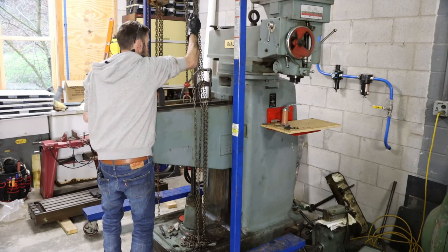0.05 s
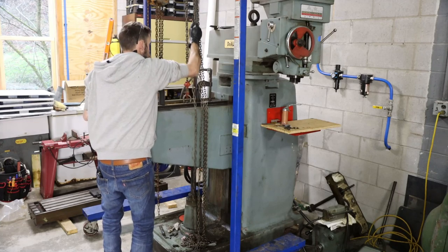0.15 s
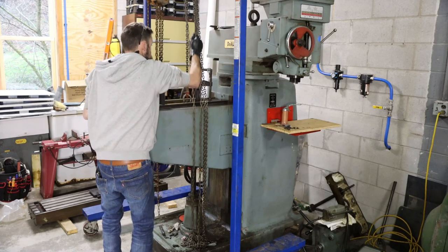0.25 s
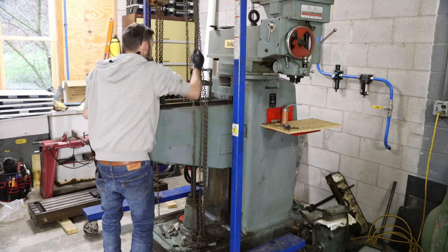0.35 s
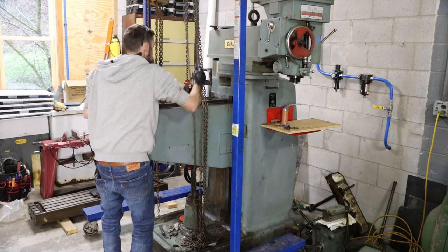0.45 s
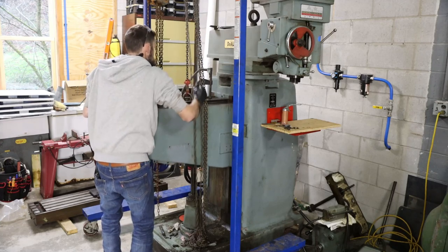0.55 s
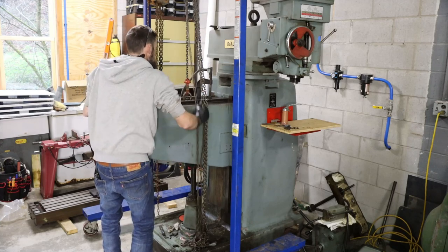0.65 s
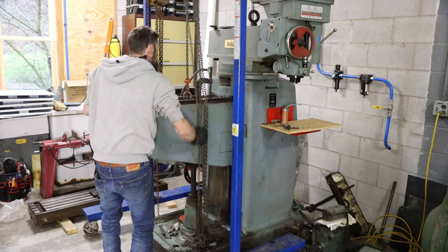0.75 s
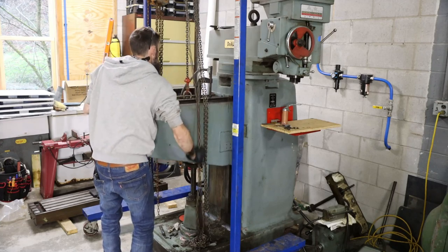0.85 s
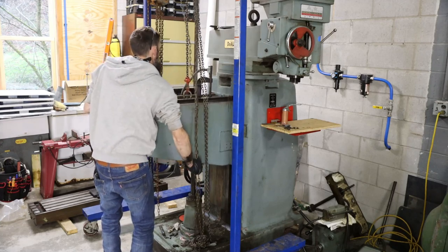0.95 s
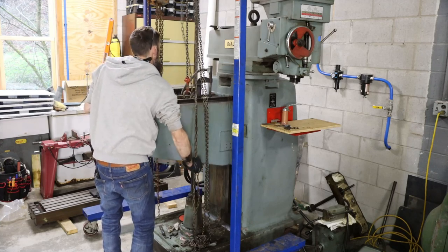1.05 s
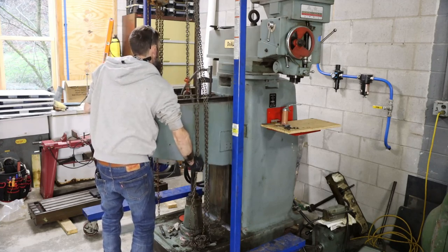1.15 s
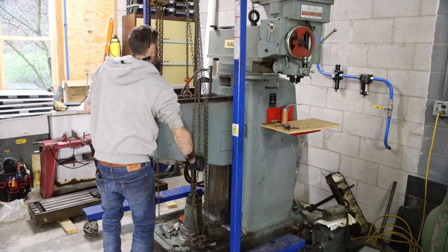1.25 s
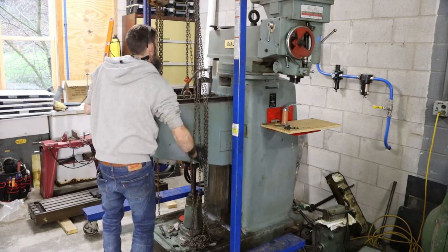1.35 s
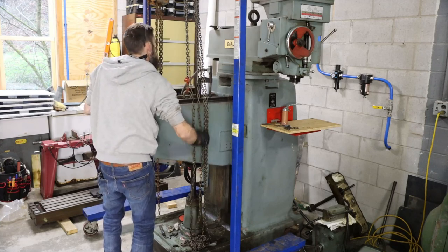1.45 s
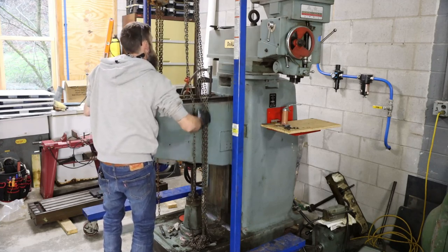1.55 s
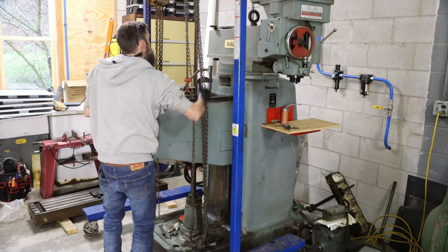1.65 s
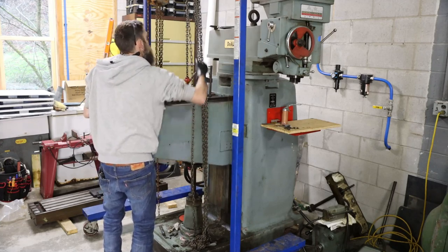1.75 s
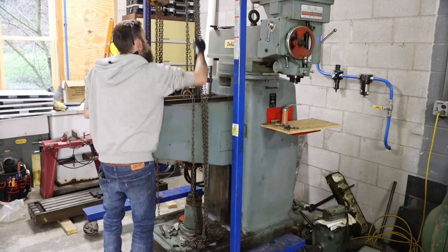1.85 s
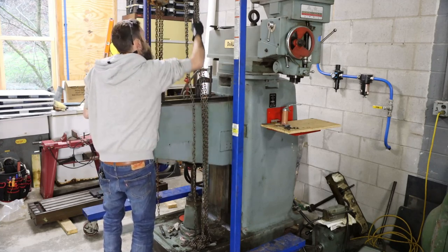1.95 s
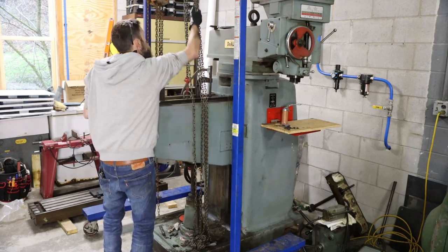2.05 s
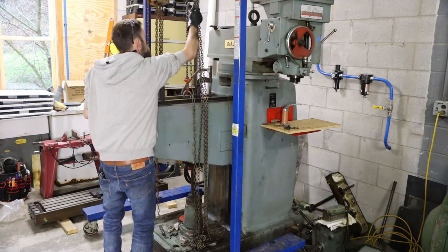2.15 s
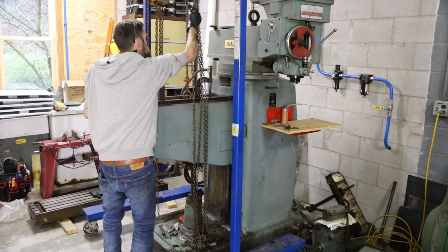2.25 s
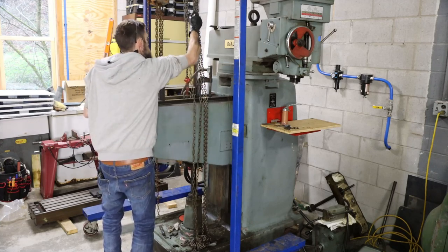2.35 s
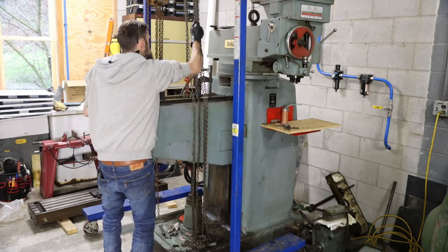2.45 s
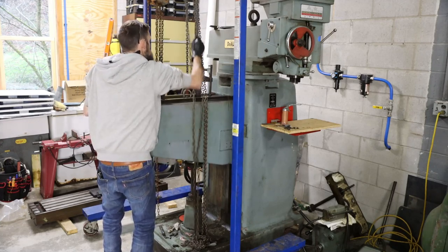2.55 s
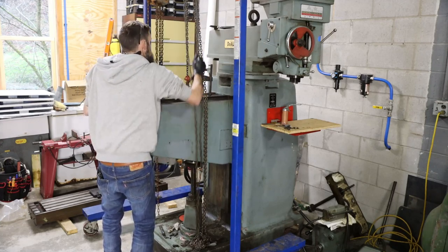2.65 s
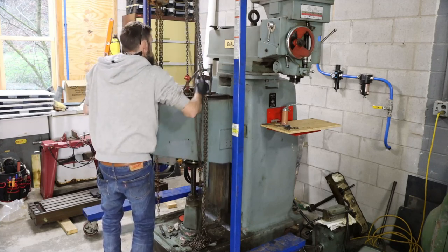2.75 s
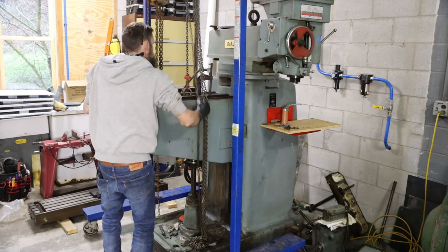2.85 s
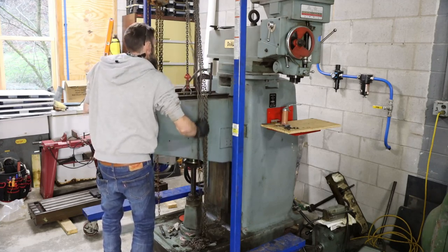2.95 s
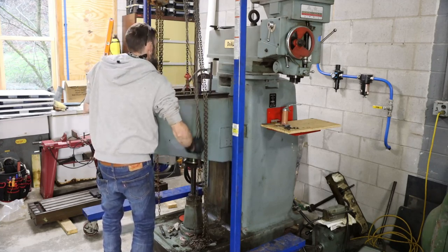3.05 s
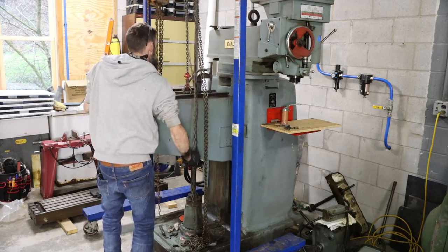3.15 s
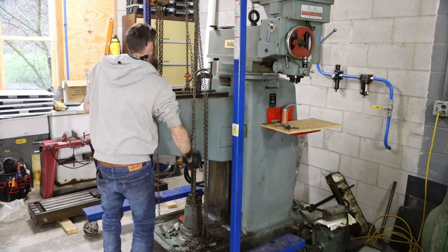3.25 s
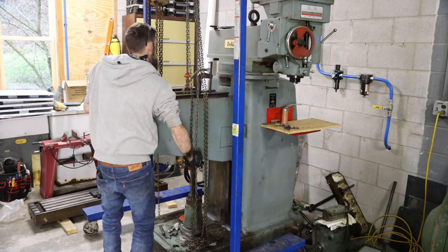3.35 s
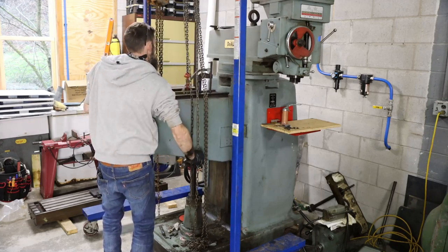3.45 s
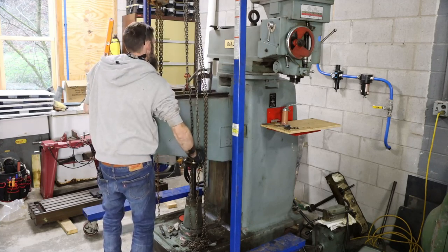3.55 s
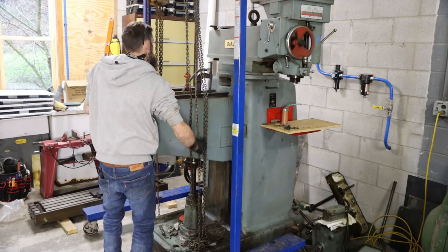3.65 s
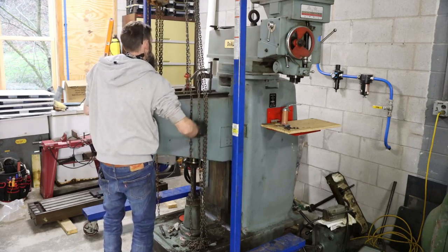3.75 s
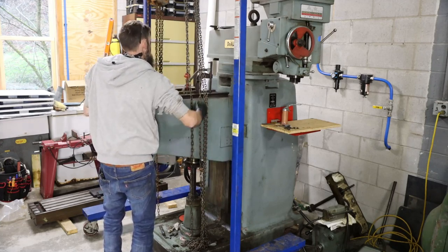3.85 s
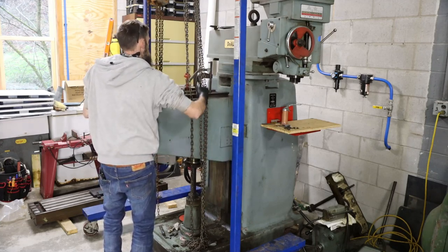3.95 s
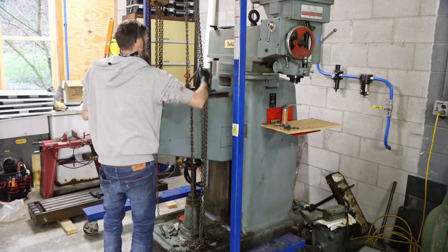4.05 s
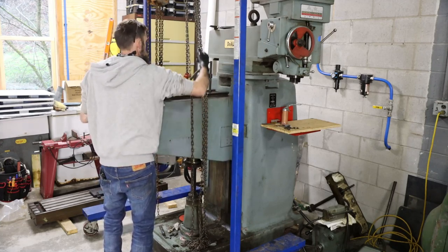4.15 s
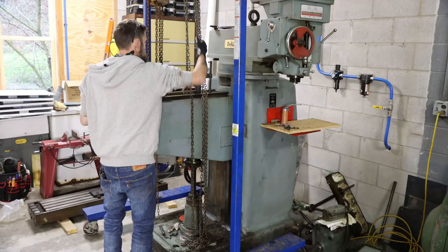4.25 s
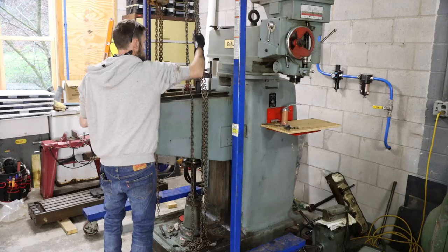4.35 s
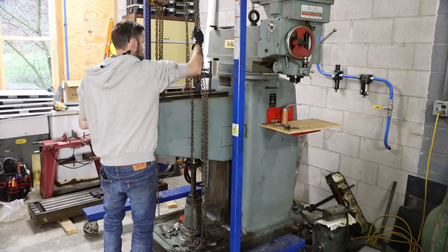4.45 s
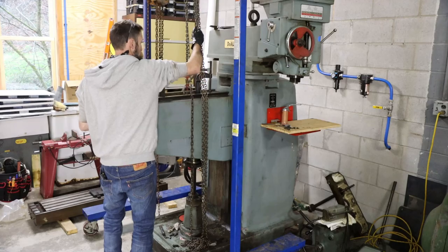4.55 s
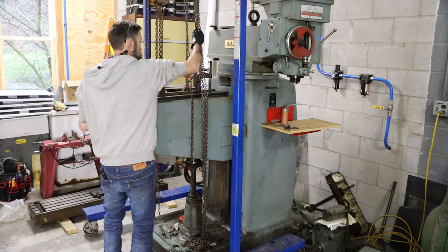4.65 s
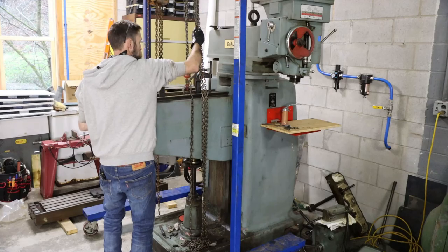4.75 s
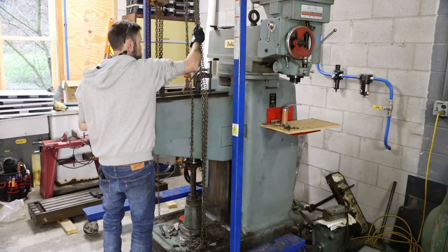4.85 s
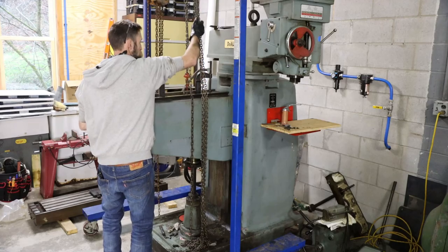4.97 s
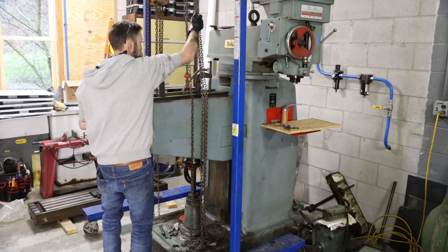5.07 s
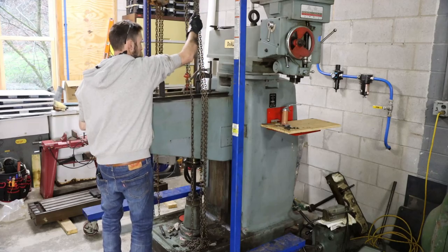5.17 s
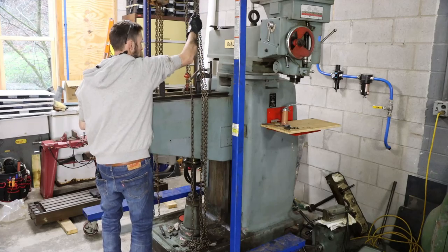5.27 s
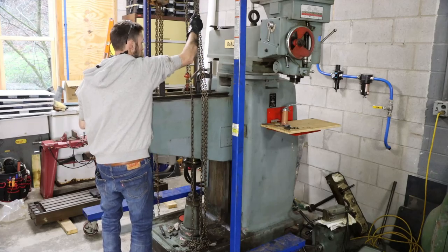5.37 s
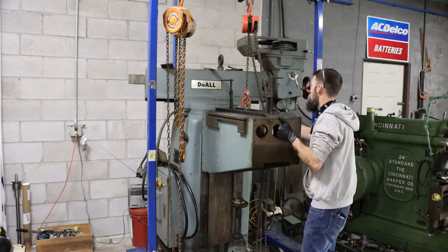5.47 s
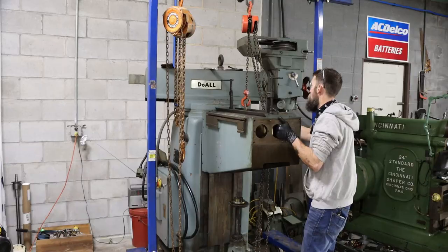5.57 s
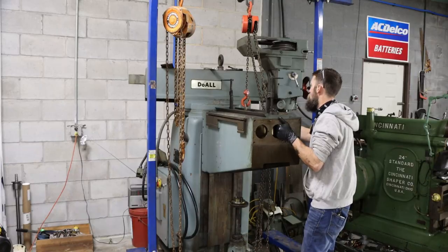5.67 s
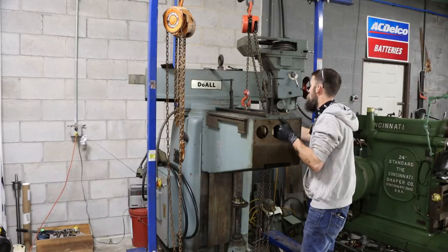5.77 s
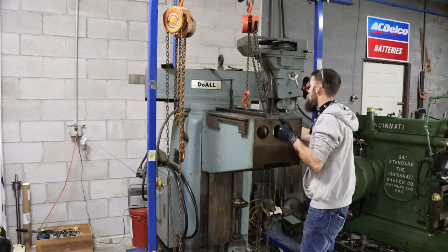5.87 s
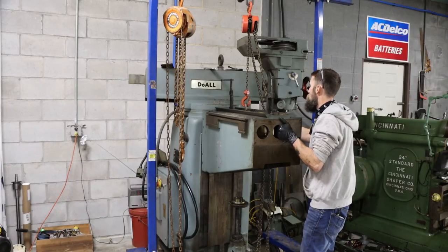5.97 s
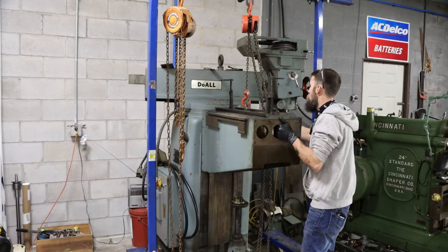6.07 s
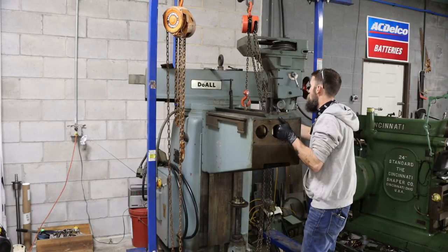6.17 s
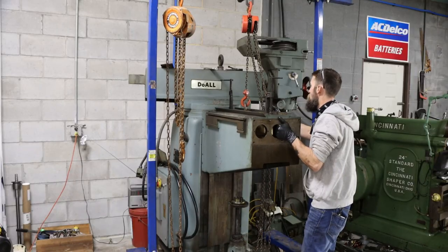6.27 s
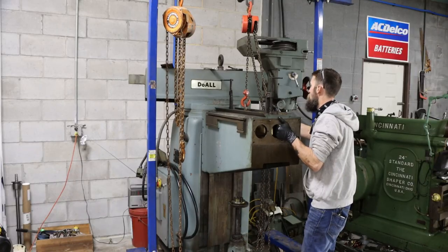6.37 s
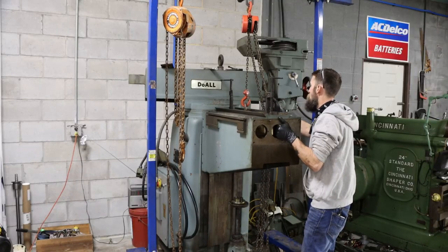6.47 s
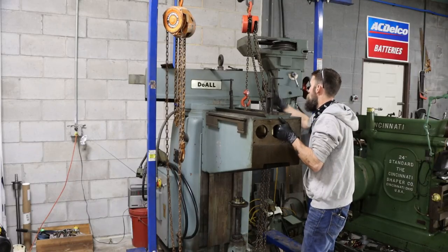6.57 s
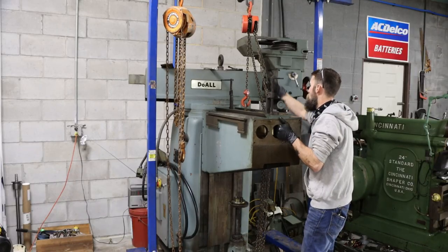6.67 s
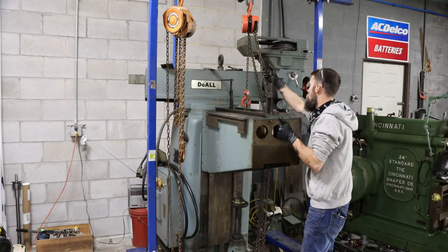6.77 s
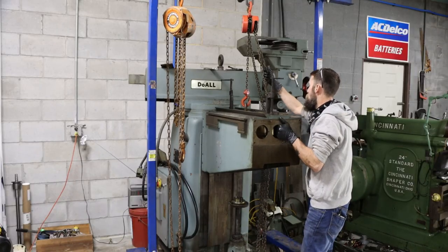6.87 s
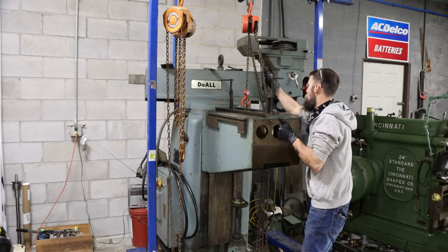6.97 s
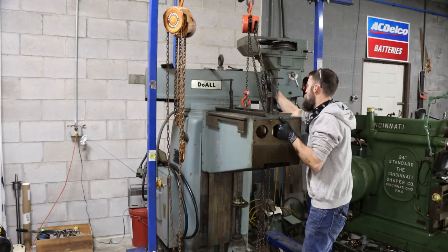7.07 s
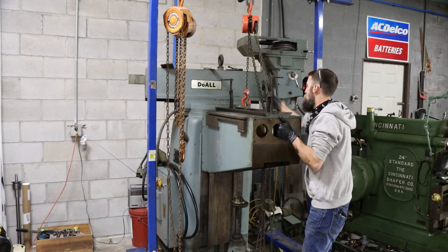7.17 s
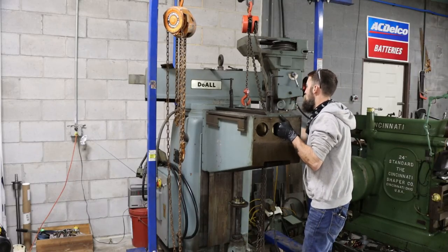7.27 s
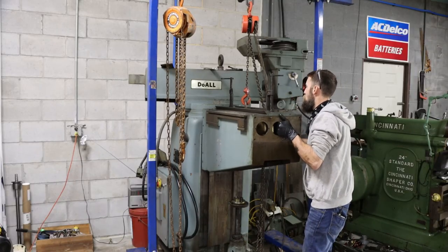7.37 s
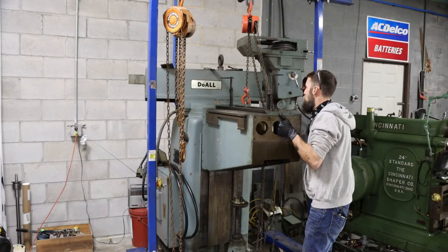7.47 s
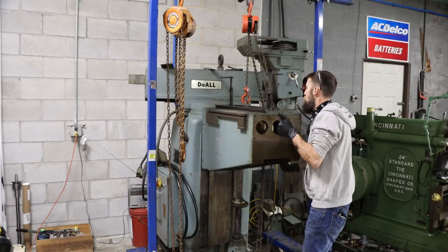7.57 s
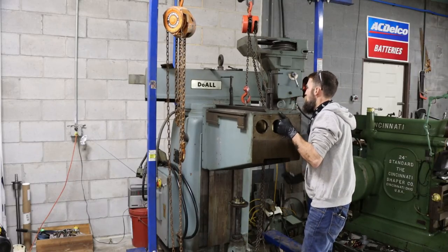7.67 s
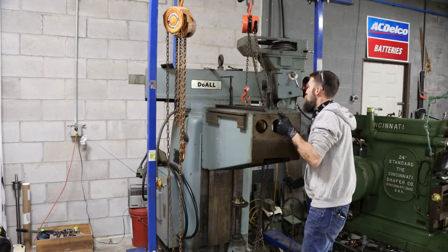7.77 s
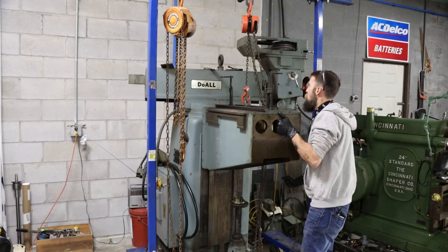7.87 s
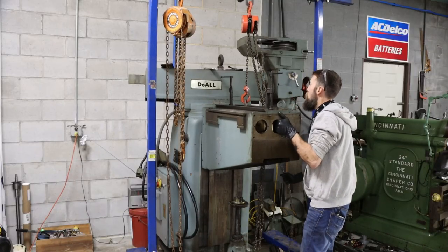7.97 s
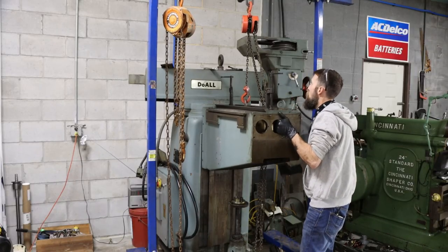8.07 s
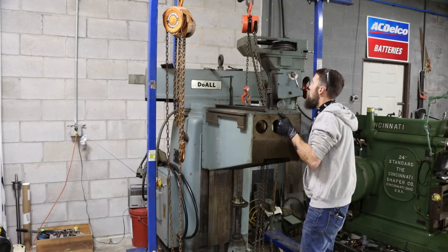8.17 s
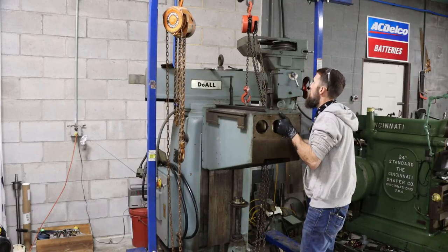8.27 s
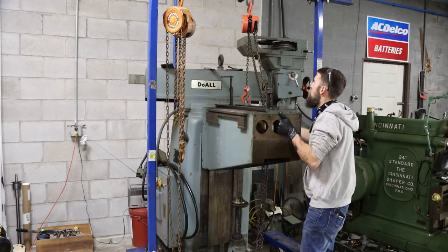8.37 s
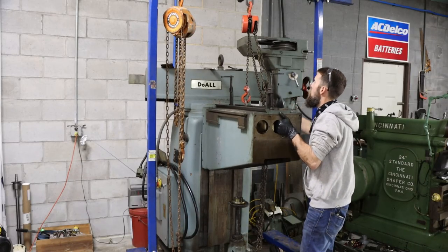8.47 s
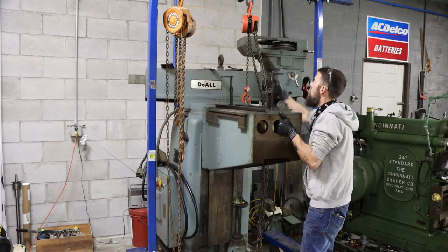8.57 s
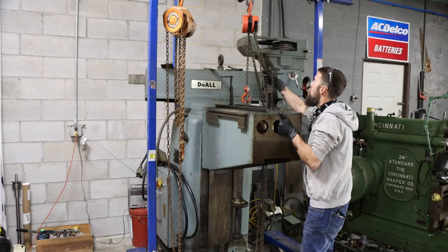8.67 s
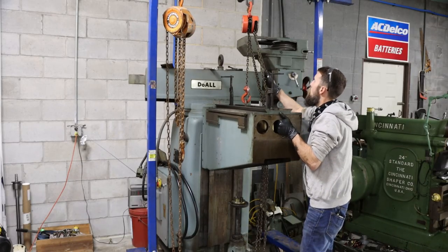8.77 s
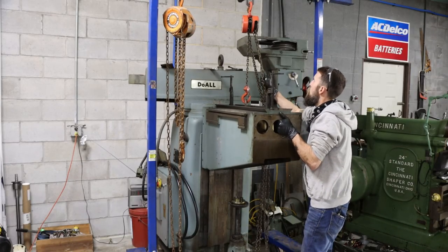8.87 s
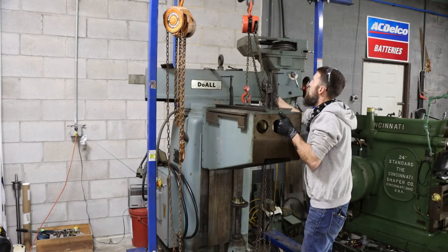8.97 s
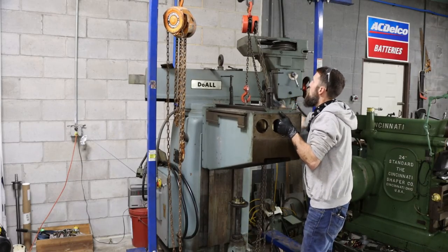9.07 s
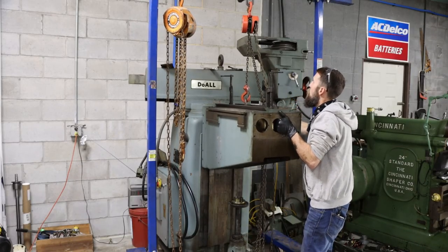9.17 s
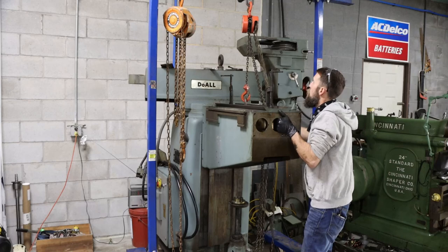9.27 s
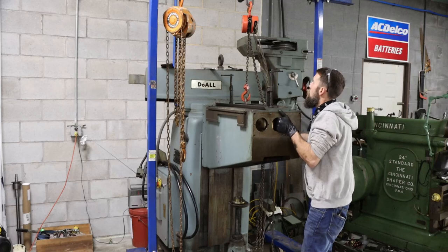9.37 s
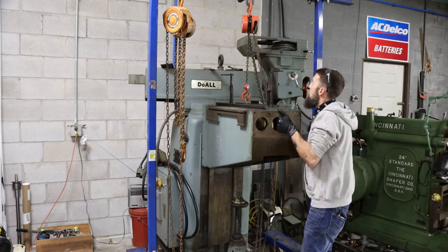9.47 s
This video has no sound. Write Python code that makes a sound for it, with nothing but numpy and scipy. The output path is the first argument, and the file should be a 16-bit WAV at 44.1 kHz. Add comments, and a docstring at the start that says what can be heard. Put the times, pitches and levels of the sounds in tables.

```python
"""Two hand chain hoists lift a heavy iron casting in a block-walled machine shop.
First one hoist is pulled twice: the brake pawl clicks over its ratchet, links clink on the hand wheel
and the gear housing clatters. Between pulls the slack chain swings and knocks, and a sleeve rustles.
Near 4 s and 6 s the hanging load shifts, and the blow sets the frame booming in its normal modes.
From 7 s the second hoist is pulled twice, at a slower tooth rate."""
import sys
import numpy as np
from scipy import signal
from scipy.fft import rfft, irfft
from scipy.io import wavfile
from scipy.ndimage import uniform_filter1d, map_coordinates

SR = 44100
rng = np.random.default_rng(int(sys.argv[2]) if len(sys.argv) > 2 else 0)


def write(x):
    x = np.atleast_2d(x).T
    wavfile.write(sys.argv[1], SR, np.round(np.clip(x, -1, 1) * 32767).astype(np.int16))


N = 419832
TIME = np.arange(N) / SR
AT_FIRST_HOIST = TIME < 5.45


def amp(db):
    """Level is logarithmic: 20 dB is a factor of ten in amplitude."""
    return 10 ** (np.asarray(db) / 20)


def noise():
    """White noise: independent samples give a flat spectrum of unit power."""
    return rng.standard_normal(N)


def wander(per_s):
    """Random modulation: straight lines join per_s Gaussian values a second."""
    return np.interp(TIME * per_s, np.arange(N), noise())


def convolve(x, response):
    """Convolution with an impulse response scaled to unit energy."""
    return signal.fftconvolve(x, response / np.sqrt(np.sum(response ** 2)))[:N]


def colour(x, points, size=2048):
    """Minimum-phase filtering through points of (frequency [Hz], relative level [dB])."""
    hz, db = np.transpose(points)
    grid = np.maximum(np.arange(size // 2 + 1) * SR / size, 1)
    gain = amp(np.interp(np.log(grid), np.log(hz), db))
    cepstrum = irfft(np.log(gain))
    cepstrum[1:size // 2] *= 2
    cepstrum[size // 2 + 1:] = 0
    return convolve(x, irfft(np.exp(rfft(cepstrum))))


def resonate(x, modes):
    """Modal superposition: each mode is a damped sine, and a wider band decays sooner."""
    t = TIME[:SR // 2]
    rings = [(-1) ** k * amp(db) * np.sqrt(width)
             * np.exp(-np.pi * width * t) * np.sin(2 * np.pi * hz * t)
             for k, (hz, width, db) in enumerate(modes)]
    return convolve(x, sum(rings))


def envelope(times, db, fade_s, rise_s):
    """Incoherent addition: contacts swell and die away, and their powers sum."""
    hits = np.zeros(N)
    np.add.at(hits, np.clip(np.asarray(times) * SR, 0, N - 1).astype(int), amp(db) ** 2)
    t = TIME[:SR]
    shape = (1 - np.exp(-t / rise_s)) * np.exp(-t / fade_s)
    power = signal.fftconvolve(hits, (shape / shape.max()) ** 2)[:N]
    return np.sqrt(np.maximum(power, 0))


def shop_air():
    """Stationary noise: the quiet air of the shop, strongest at low frequencies."""
    # (frequency [Hz], level [dB])
    spectrum = [(15, -53), (25, -8), (333, -2.5), (382, 2), (500, -5.5), (749, -3.5), (1180, -12),
                (1280, -13.5), (2390, -18), (6140, -25), (13400, -31), (15800, -35.5)]
    return amp(-56) * colour(noise(), spectrum)


def room(x, low_t60, high_t60, low_db, high_db):
    """Reverberation: the block walls return a diffuse field whose treble decays sooner."""
    t = TIME[:SR]
    low_band = signal.butter(2, 2500, fs=SR, output="sos")
    high_band = signal.butter(1, [2500, 9000], "bandpass", fs=SR, output="sos")
    tail = sum(signal.sosfilt(band, rng.standard_normal(SR)) * amp(db - 60 * t / t60) / np.sqrt(t60)
               for band, db, t60 in ((low_band, low_db, low_t60), (high_band, high_db, high_t60)))
    tail *= (1 - np.exp(-t / 0.0009)) * np.sqrt(2 * np.log(1000) / SR)
    return x + signal.fftconvolve(x, tail)[:N]


# The body leans into the chain: (time [s], level [dB])
HEAVES = [(.25, -39.5), (1.822, -59), (2.58, -46)]
def heaves():
    """Soft impact: the moving body makes muffled bumps with little but bass."""
    bumps = noise() * envelope(*np.transpose(HEAVES), fade_s=0.1, rise_s=0.045)
    return colour(bumps, [(25, -15.5), (90, 2.0), (170, 2.0), (280, -15.5), (2000, -60)])


# Spectrum of rubbing cloth: (frequency [Hz], level [dB])
CLOTH = [(60, -52), (300, -15.5), (1000, -9.5), (2500, -7.5), (4500, -0.5), (6500, -3.5), (9000, -4),
         (12000, -7.5), (15800, -15)]
# The arm reaches up: (centre time [s], half length [s], level [dB])
REACHES = [(1.85, 0.26, -48), (4.13, 0.34, -50), (5.06, 0.12, -56.5), (6.21, 0.086, -63.5),
           (6.658, 0.17, -52.5), (8.34, 0.014, -48), (8.51, 0.23, -47.5)]
# Small dry ticks: (time [s], level [dB])
TICKS = [(1.336, -40), (5.976, -40.5), (5.999, -43), (6.015, -41), (6.149, -42), (6.194, -34), (7.032, -36),
         (8.089, -27), (8.201, -26)]
def sleeve():
    """Stick-slip friction: cloth catches unevenly, and a drifting comb filter colours it as it folds."""
    slide = sum(amp(db) * np.exp(-((TIME - middle) / half) ** 2) for middle, half, db in REACHES)
    rub = noise() * slide * amp(7.6 + 2.6 * wander(220) + 0.43 * wander(6))
    fold_lag = .0002 * np.exp(0.33 * wander(16))
    rub += 0.22 * map_coordinates(rub, [(TIME - fold_lag) * SR], order=3)
    ticks = noise() * envelope(*np.transpose(TICKS), fade_s=0.00091, rise_s=.0001)
    low_cut = signal.butter(2, 500, "highpass", fs=SR, output="sos")
    return signal.sosfilt(low_cut, colour(rub + ticks, CLOTH))


# The load shifts: (time [s], thud level [dB], ring level [dB])
BOOMS = [(4.215, -6.5, -19.5), (6.261, -18, -20)]
# Spectrum of the rumble: (frequency [Hz], level [dB])
RUMBLE = [(25, -34.5), (60, -6.5), (110, -10), (175, 1), (280, -2), (420, -11.5), (600, -11), (900, -17.5),
          (1600, -29), (3000, -45), (15000, -65)]
# Low modes driven by the blow: (frequency [Hz], level [dB], decay time [s])
BLOW_MODES = [(193.5, -4.5, 0.021), (168, -10, 0.09), (278, -5.5, 0.01), (280, -20, 0.14)]
# Modes of the loaded frame: (frequency [Hz], level [dB], time to fall 60 dB [s])
FRAME_MODES = [(116, -8.5, 0.9), (233, -22.5, 2.4), (374, -14.5, 0.86), (565, -16, 1.0), (870, -21.5, 0.37),
               (1010, -28.5, 1.5), (1120, -32, 0.65), (1385, -24, 0.94), (1745, -36, 0.35)]
TWIN_HZ = (674.5, 681.7)
def load_booms():
    """Free vibration: after a dull blow the frame rumbles and rings, and two close modes beat."""
    times, thud_db, _ = np.transpose(BOOMS)
    out = colour(noise() * envelope(times, thud_db - 12, fade_s=0.13, rise_s=0.002), RUMBLE)
    low_cut = signal.butter(2, 120, "highpass", fs=SR, output="sos")
    for start, blow_db, ring_db in BOOMS:
        i = int(start * SR)
        t = TIME[:min(2 * SR, N - i)]
        blow = sum(amp(blow_db + db) * np.exp(-t / fade) * np.sin(2 * np.pi * hz * t)
                   for hz, db, fade in BLOW_MODES)
        blow = signal.sosfilt(low_cut, blow)  # a slim frame radiates little deep bass
        ring = sum(amp(ring_db + db - 60 * t / t60) * np.sin(2 * np.pi * hz * t)
                   for hz, db, t60 in FRAME_MODES)
        lower, upper = (np.sin(2 * np.pi * hz * t) for hz in TWIN_HZ)
        beating = amp(ring_db - 6.5 - 60 * t / 0.78) * (lower - 1.27 * upper)  # starts in antiphase
        out[i:i + len(t)] += blow + beating + ring * (1 - np.exp(-t / .015))
    return out


def loose_touches(drag_db=-29, drag_rise_s=0.038, drag_fade_s=0.11,
                  swing_db=-34, swing_fade_s=0.52, touches_per_s=13):
    """Damped swinging: the envelope of a chain that drags taut, then, let go, touches ever more softly."""
    starts, ends = np.transpose(PULLS_A + PULLS_B)[:2]
    drag = sum(np.exp(-np.maximum((s - TIME) / drag_rise_s, (TIME - s) / drag_fade_s)) for s in starts)
    chance = rng.random((len(ends), 18, 2))
    after = (np.arange(chance.shape[1]) + chance[..., 0]) / touches_per_s
    db = swing_db + 20 * np.log10(np.exp(-after / swing_fade_s)) + 8 * (chance[..., 1] - .5)
    swing = envelope((ends[:, None] + after).ravel(), db.ravel(), fade_s=0.024, rise_s=0.0022)
    return np.hypot(amp(drag_db) * drag, swing)


# The chain brushes the casting: (time [s], level [dB], decay time [s], relative treble level [dB])
BRUSHES = [(.075, -70, 0.037, -10), (1.309, -30, 0.038, -3), (1.788, -31.5, .03, -0.5),
           (1.816, -23.5, 0.015, -4), (1.987, -22, 0.0075, -21), (3.726, -21, 0.027, -3),
           (3.998, -34, 0.034, -2), (4.133, -39, 0.023, 8.5), (4.795, -33.5, 0.026, -15),
           (5.541, -41.5, 0.059, -5), (5.965, -44.5, 0.011, -23), (6.164, -47, 0.0082, -24),
           (6.71, -40, 0.095, 2.5), (8.351, -39.5, 0.075, -15), (8.563, -36, 0.073, -3),
           (8.68, -46.5, 0.09, -6)]
# Modes at the two ends of the casting: (frequency [Hz], bandwidth [Hz], level [dB])
CASTING_A = [(569, 6.4, -5.5), (790, 440, -8), (1009, 22, 0.5), (1051, 60, -2), (1192, 25, -6.5),
             (1380, 300, -10), (1610, 22, -5.5), (1726, 20, -8.5), (2140, 110, -10.5), (2530, 170, -11),
             (3700, 1200, -5.5)]
CASTING_B = [(677, 71, 2.5), (746, 280, 3.5), (932, 140, 1.5), (1065, 88, 2.5), (1275, 260, -4.5),
             (1630, 63, -5.5), (3100, 610, -7.5)]
def slack_chain():
    """Random excitation: many links touch the iron in quick succession and drive its modes."""
    brush, t = np.zeros((2, N + SR)), TIME[:SR // 2]  # rows: bass, treble
    for start, db, fade, treble_db in BRUSHES:
        i = int(start * SR)
        brush[:, i:i + len(t)] += amp([[db], [db + treble_db]]) * np.exp(-t / fade)
    touch = np.hypot(uniform_filter1d(brush[:, :N], size=600), loose_touches())
    touch *= amp(2.2 * wander(130) + 0.6)  # link after link, never evenly
    force = sum(signal.sosfilt(signal.butter(3, 1400, band, fs=SR, output="sos"), noise() * strength)
                for band, strength in zip(("lowpass", "highpass"), touch))
    iron = resonate(force * AT_FIRST_HOIST, CASTING_A)
    iron += amp(2.5) * resonate(force * ~AT_FIRST_HOIST, CASTING_B)
    link_scrape = amp(-11.5) * colour(noise() * touch[1], CLACK)
    return iron + link_scrape


# Spectrum of a link striking metal: (frequency [Hz], level [dB])
CLACK = [(100, -30), (600, -10), (1100, 5.5), (1700, -12.5), (2400, -9.5), (3000, -10), (3400, -15),
         (3950, -2.5), (4400, -3.5), (5000, 2.5), (5700, -6.5), (6450, 2.5), (7400, -5), (11000, -7.5),
         (15800, -22)]
# Chain hits wheel and hook: (time [s], clack level [dB], housing level [dB], link level [dB])
KNOCKS = [(0.073, -39, -29, -37), (.281, -15, -30, -10.5), (1.173, -18, -18.5, -22), (2.025, -32, -30, -48),
          (2.108, -15.5, -27, -46), (2.205, -18, -26, -35), (2.27, -34.5, -28, -33), (2.537, -6, -27, -10),
          (3.442, -17, -25.5, -16.5), (3.465, -10.5, -13.5, -22), (5.491, -32, -35, -41),
          (5.575, -38, -44, -46), (5.652, -31.5, -31.5, -35), (6.809, -34, -33, -39),
          (6.947, -44, -29.5, -55), (6.961, -48, -44, -45), (7.198, -6, -8, -13), (7.256, -1.5, -11.5, -25),
          (7.335, -2, -15.5, -18), (7.669, -2, -7.5, -32), (7.766, -2.5, -20, -15), (7.92, -13, -23, -25),
          (7.932, -25, -14, -18.5), (7.976, -15.5, -47, -46), (8.046, -17.5, -19.5, -24),
          (8.083, -25, -34, -44), (8.847, -43, -26.5, -38), (9.033, -32, -12, -29),
          (9.084, -33.5, -27, -30), (9.338, -18, -24, -22)]
def knocks():
    """Impact excitation: a brief contact gives a broadband clack and rings the housing and the link."""
    times, clack_db, housing_db, link_db = np.transpose(KNOCKS)
    clack = colour(noise() * envelope(times, clack_db - 4.5, fade_s=0.0038, rise_s=0.00022), CLACK)
    force = envelope(times, housing_db, fade_s=0.0059, rise_s=0.00021)
    ring = resonate(noise() * force * AT_FIRST_HOIST, HOUSING_A)
    ring += resonate(noise() * force * ~AT_FIRST_HOIST, HOUSING_B)
    clatter = colour(noise() * force, CLATTER)
    return clack + amp(-2) * ring + amp(-5.5) * clatter + clinks(times, link_db + 1.5, LINKS_A)


# The brake catches after a pull: (time [s], level [dB])
CATCHES = [(1.171, -24.5), (3.465, -23.5), (7.923, -28.5)]
# Modes of the brake: (frequency [Hz], bandwidth [Hz], level [dB])
BRAKE_MODES = [(322, 50, -9), (408, 22, -5.5), (558, 57, -4.5), (655, 130, 2), (764, 59, -1)]
def brake():
    """Transient response: the brake takes the load, and its low, damped modes clunk."""
    force = noise() * envelope(*np.transpose(CATCHES), fade_s=0.019, rise_s=0.0033)
    return resonate(force, BRAKE_MODES)


# Modes of each hoist's chain links: (frequency [Hz], bandwidth [Hz], level [dB])
LINKS_A = [(4690, 92, 0.5), (5005, 130, 2.5), (5005, 170, 7.5), (5850, 190, 10)]
LINKS_B = [(4680, 210, 6), (4870, 51, -4.5), (5090, 110, -0.5), (6060, 197, 6.5)]
def clinks(times, db, modes, spread=0.082):
    """Natural frequencies: each contact rings three random modes, detuned as no two links are alike."""
    out, t = np.zeros(N + SR), TIME[:SR // 20]
    for start, size, chance in zip(times, amp(db), rng.random((len(times), 3, 2))):
        i = int(max(start, 0) * SR)
        for pick, detune in chance:
            hz, width, mode_db = modes[int(pick * len(modes))]
            shape = (1 - np.exp(-t / 0.0015)) * np.exp(-np.pi * width * t)
            tone = np.sin(2 * np.pi * hz * (1 + spread * (detune - .5)) * t)
            out[i:i + len(t)] += size * amp(mode_db) * shape * tone
    return out[:N]


# Modes of each gear housing: (frequency [Hz], bandwidth [Hz], level [dB])
HOUSING_A = [(399, 44, -15.5), (591, 65, -5), (644, 64, -6.5), (780, 22, -5), (989.5, 35, 0.5),
             (1068, 43, -3), (1200, 78, -12), (1560, 97, -3), (1875, 130, -5.5), (2906, 140, -5),
             (3140, 88, -9.5), (3810, 88, -9)]
HOUSING_B = [(422, 30, -17.5), (631, 66, -5), (666, 29, -6), (745, 50, -5), (799, 49, -5), (963, 44, -2),
             (1130, 218, 0), (1230, 87, -6), (1612, 70, -9.5), (1760, 29, -12), (2915, 105, -6),
             (3400, 360, -11.5)]
# Spectrum of the housing's clatter: (frequency [Hz], level [dB])
CLATTER = [(30, -25.5), (80, -22.5), (160, -14), (240, -24), (340, 0), (500, -5.5), (900, 11.5), (1400, -4),
           (2000, 1.5), (2600, -17), (5000, -9.5), (15000, -36.5)]
def gears(drops, lag, db, scatter_db, modes, ring_db, clatter_db):
    """Forced vibration: gears strike at each tooth and loosely between teeth, driving the housing."""
    between = envelope(drops + lag, db + scatter_db, fade_s=0.0078, rise_s=0.00034)
    on_tooth = envelope(drops, db - 6.2, fade_s=0.012, rise_s=0.00026)
    force = np.hypot(between, on_tooth)
    ring = resonate(noise() * force, modes)
    return amp(ring_db) * ring + amp(clatter_db) * colour(noise() * force, CLATTER)


# Spectrum of each pawl's click: (frequency [Hz], level [dB])
PAWL_A = [(300, -34.5), (1500, -14), (2400, -8.5), (3800, 0), (4400, -9), (5500, -6), (7100, -3.5),
          (8000, -0.5), (9400, 0.5), (10800, -3), (12200, -2), (13500, -13), (15800, -10)]
PAWL_B = [(300, -60), (1500, -3.5), (2400, -10), (3800, -2), (4400, -5.5), (6000, -5), (7100, -3),
          (8300, 0), (9400, -0.5), (10500, -2), (12000, -2), (13500, -13), (15800, -10.5)]
def pawl(drops, lag, snap_db, bounce_db, spectrum):
    """Impact and rebound: the pawl snaps onto each tooth and bounces once."""
    snap = envelope(drops, snap_db, fade_s=.0046, rise_s=.0009)
    bounce = envelope(drops + lag, bounce_db, fade_s=.0035, rise_s=.0007)
    return colour(noise() * np.hypot(snap, bounce), spectrum)


def ratchet(pull, end_speed_ratio=.45, jerk_s=0.062, ease_s=0.028):
    """Tooth-passing rate: its integral over a pull gives drop times, with periods and effort levels."""
    start, end, first_rate, top_rate, speed_up, slow_down, jerk_db, closing_db = pull
    t = np.arange(start, end, 1 / SR)
    run_up = np.sin(np.pi / 2 * np.minimum((t - start) / speed_up, 1))
    rate = first_rate + (top_rate - first_rate) * run_up
    rate *= np.interp(t, [end - slow_down, end], [1, end_speed_ratio])
    teeth = np.cumsum(rate) / SR
    drops = np.interp(np.arange(teeth[-1]), teeth, t)
    effort_db = jerk_db * np.exp((start - drops) / jerk_s) + closing_db * np.exp((drops - end) / ease_s)
    return drops, 1 / np.interp(drops, t, rate), effort_db


def arm_echo(x, high_lag_s=.00089, low_lag_s=.00046, share=.28):
    """Comb filtering: the path by way of the pulling arm shortens as it falls, so the notches rise."""
    turns = np.array(PULLS_A)[:, :2].ravel()
    lag = np.interp(TIME, turns, [high_lag_s, low_lag_s] * len(PULLS_A))
    reflection = map_coordinates(x, [(TIME - lag) * SR], order=3)
    return (x + share * reflection) / np.hypot(1, share)


# Pulls on each hoist: (start [s], end [s], first rate [teeth/s], top rate [teeth/s],
# speed-up [s], slow-down [s], opening level [dB], closing level [dB])
PULLS_A = [(.146, 1.07, 20.35, 74.15, .587, .17, -5.5, -8), (2.452, 3.29, 25.17, 77.65, .409, .265, .8, -3)]
PULLS_B = [(7.15, 7.83, 17.5, 56.3, .138, .2, -3, -11), (9.005, 9.8, 19.05, 49.1, .266, .15, -3, -6)]
def hoist(pulls, pawl_spectrum, housing_modes, link_modes,
          pawl_db, link_db, ring_db, clatter_db, scatter_db, bounce_db):
    """Quasi-periodic impacts: pawl, links and gears strike with each tooth, as hard as the hand pulls."""
    drops, period, effort_db = np.hstack([ratchet(pull) for pull in pulls])
    scatter = np.sqrt(3) * rng.uniform(-1, 1, (len(drops), 5)).T  # unit variance
    lag = rng.random((len(drops), 4)).T * period
    clicks = pawl(drops, lag[0], effort_db + scatter_db * scatter[0],
                  effort_db + bounce_db + 2.2 * scatter[1], pawl_spectrum)
    # one link seats in the wheel just after the tooth, while another leaves it
    seating = clinks(drops + .25 * lag[2], effort_db + link_db + 1.2 * scatter[3], link_modes)
    leaving = clinks(drops + lag[3], effort_db + link_db - 5 + 1.7 * scatter[4], link_modes)
    gear_db = effort_db + 0.5 * np.log2(np.median(period) / period)  # faster gears strike harder
    housing = gears(drops, lag[1], gear_db, 2.9 * scatter[2], housing_modes, ring_db, clatter_db)
    return amp(pawl_db) * clicks + seating + leaving + housing


def scene():
    """Superposition: hoists and chain reverberate, while load, body, sleeve and air add directly."""
    first = hoist(PULLS_A, PAWL_A, HOUSING_A, LINKS_A, pawl_db=-15.5, link_db=-12.0,
                  ring_db=-21.0, clatter_db=-22.5, scatter_db=2.5, bounce_db=-3.0)
    second = hoist(PULLS_B, PAWL_B, HOUSING_B, LINKS_B, pawl_db=-15.0, link_db=-9.0,
                   ring_db=-20.0, clatter_db=-24, scatter_db=2.0, bounce_db=-2.5)
    metal = arm_echo(first) + second + knocks() + brake() + slack_chain()
    metal = room(metal, low_t60=0.52, high_t60=0.41, low_db=-2, high_db=-4.5)
    return (metal + shop_air() + load_booms() + heaves() + sleeve())[None]


def record(dry):
    """Clipping and band limiting: peaks stop at full scale, and treble above 15.9 kHz is cut."""
    top_cut = signal.ellip(10, .2, 60, 15900, fs=SR, output="sos")
    return signal.sosfilt(top_cut, np.clip(dry, -1, 1))


dry = scene()
out = record(dry)
write(out)
```